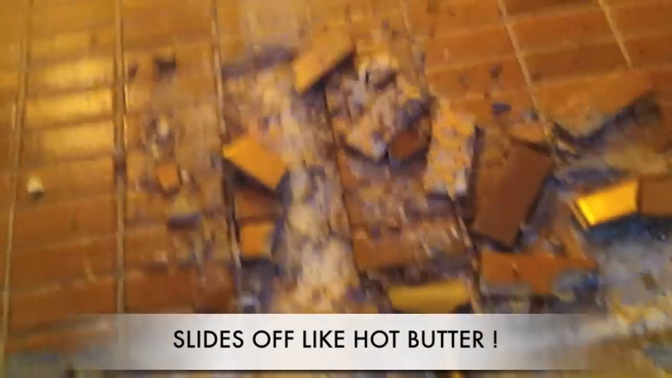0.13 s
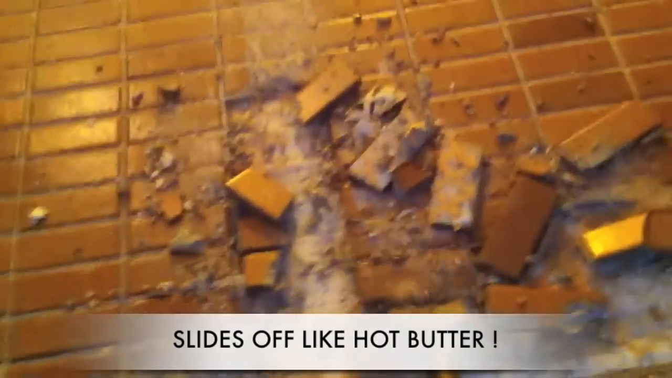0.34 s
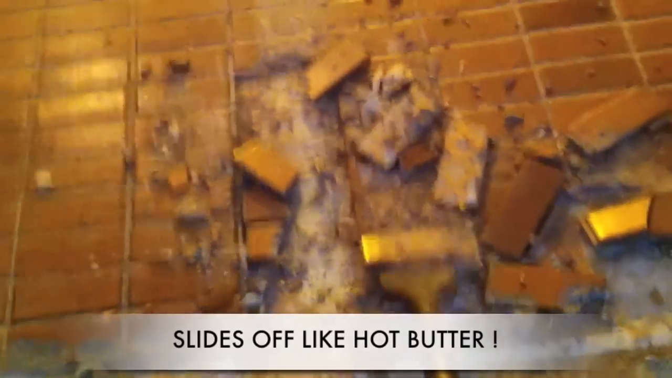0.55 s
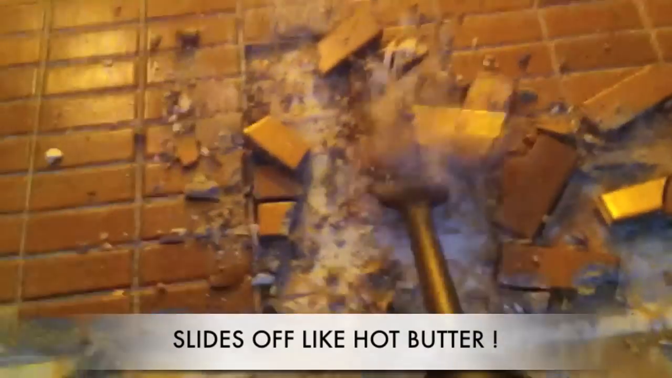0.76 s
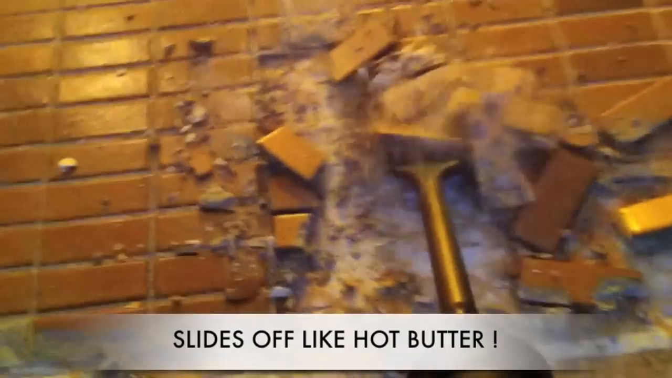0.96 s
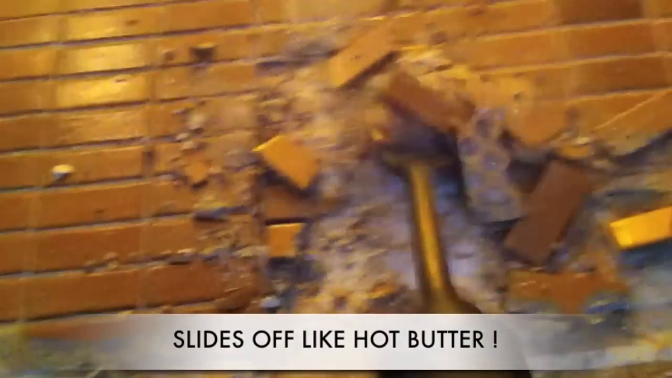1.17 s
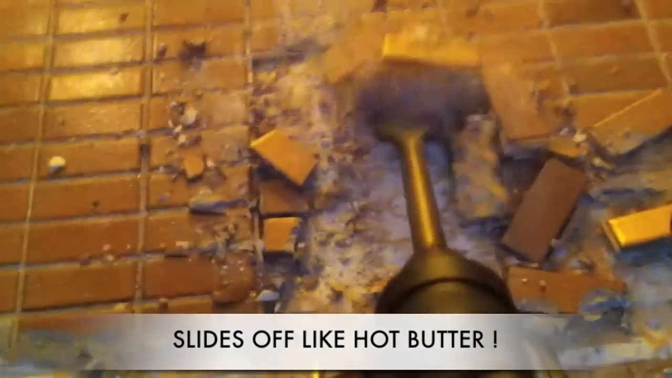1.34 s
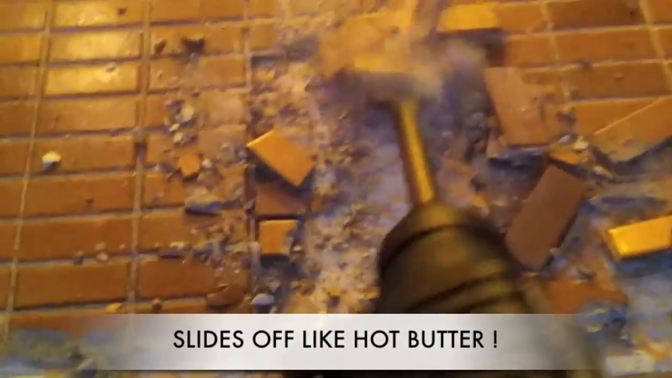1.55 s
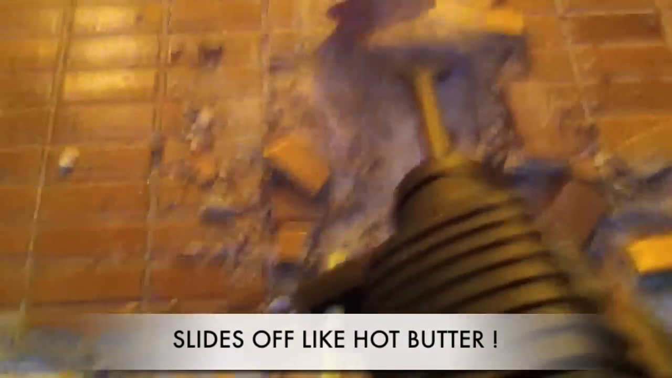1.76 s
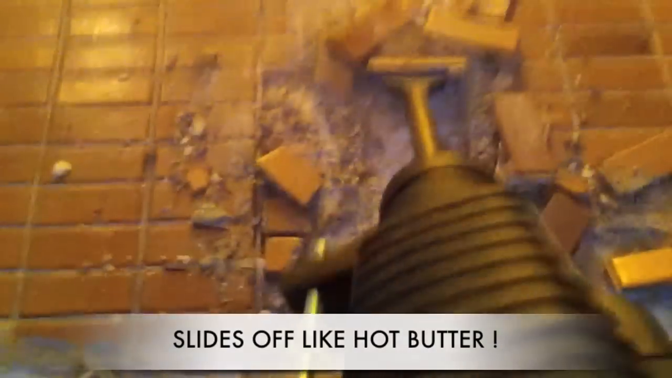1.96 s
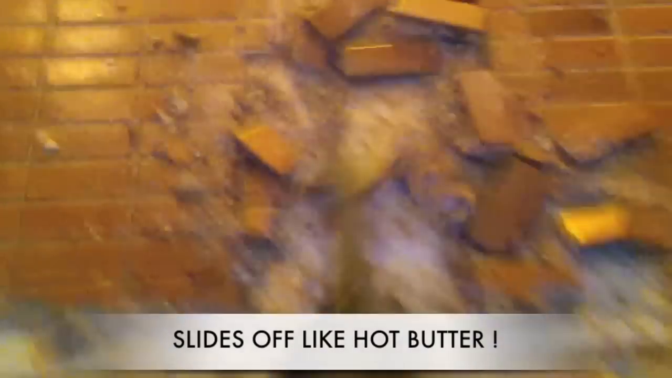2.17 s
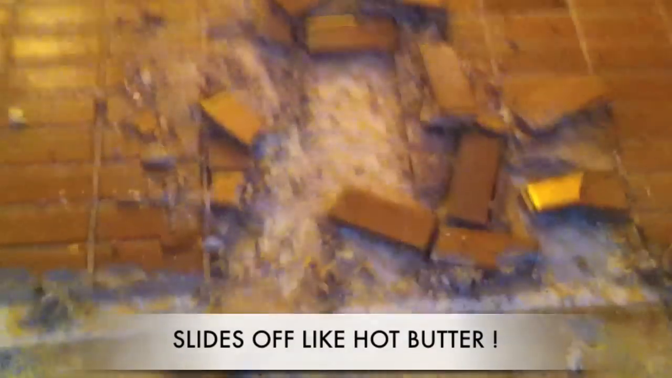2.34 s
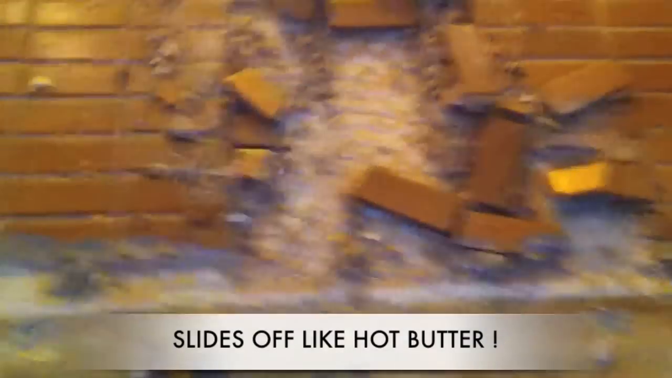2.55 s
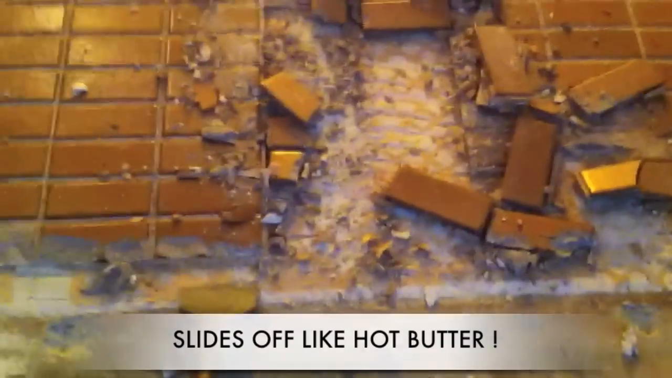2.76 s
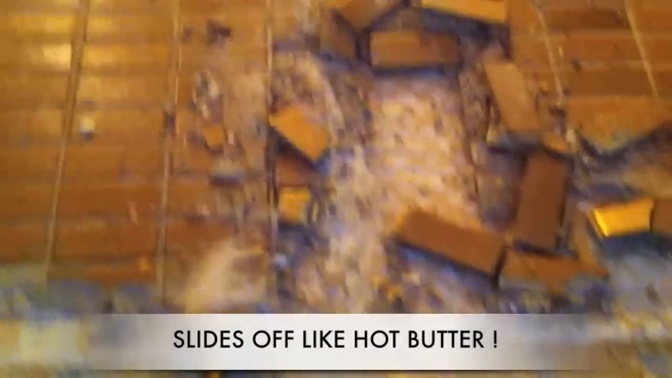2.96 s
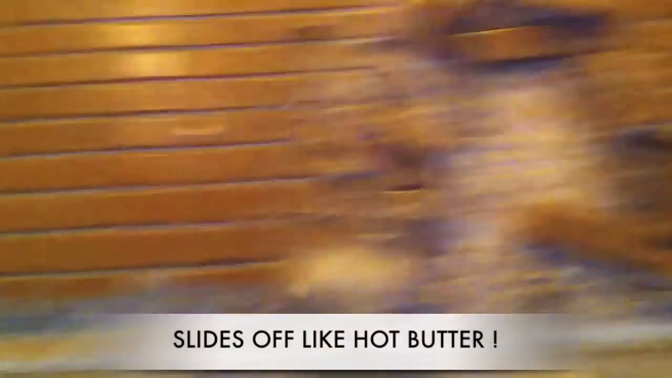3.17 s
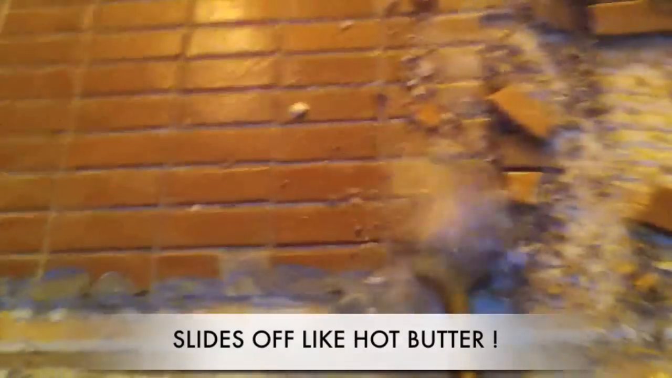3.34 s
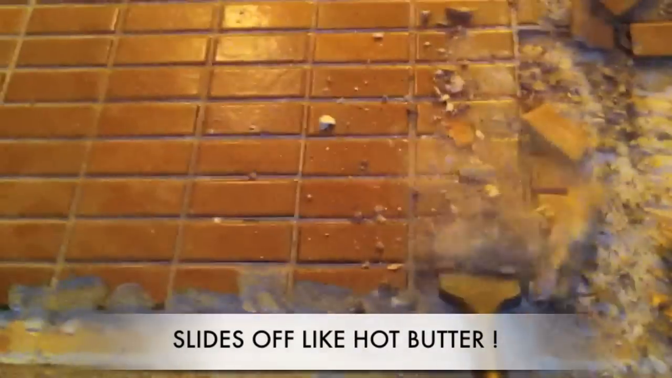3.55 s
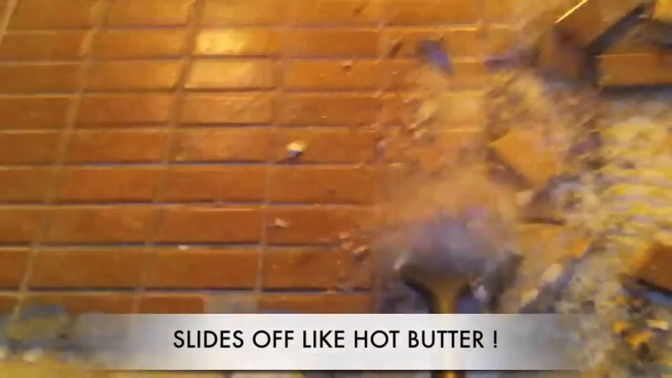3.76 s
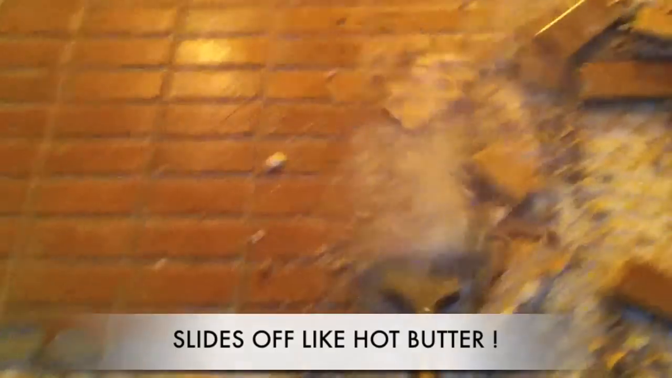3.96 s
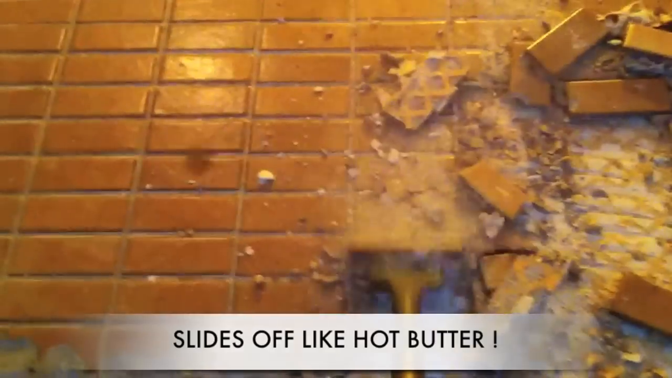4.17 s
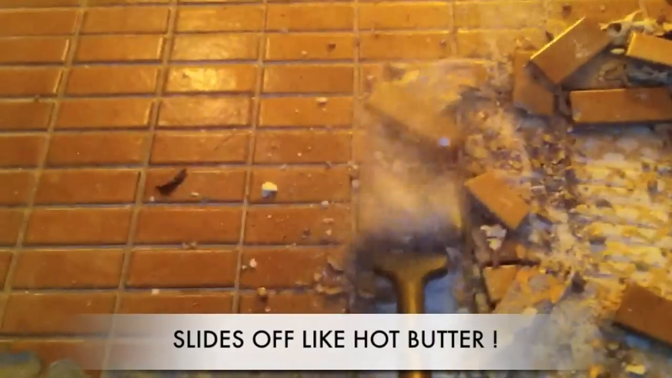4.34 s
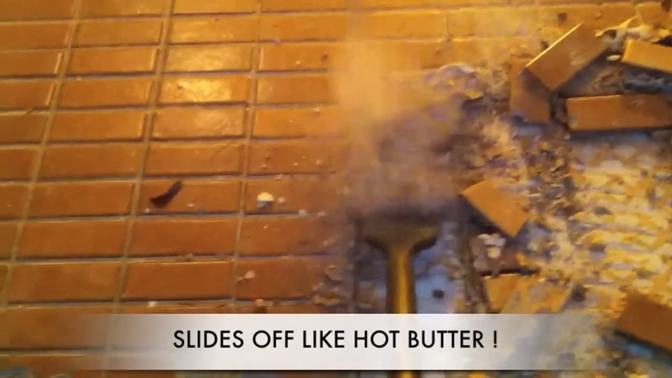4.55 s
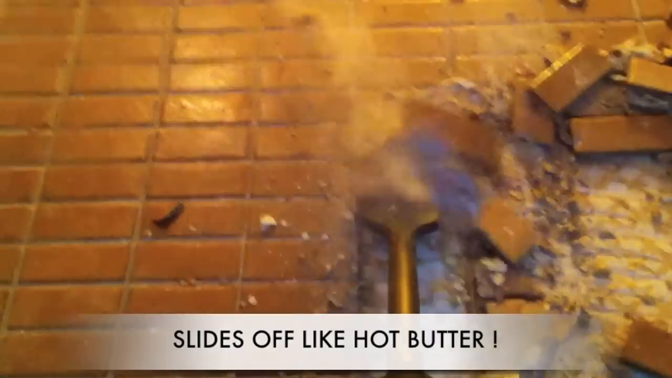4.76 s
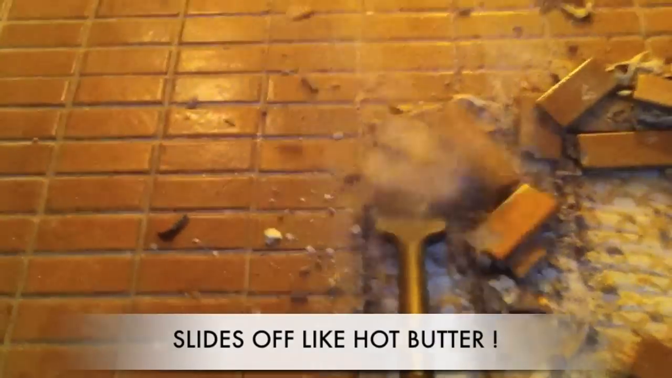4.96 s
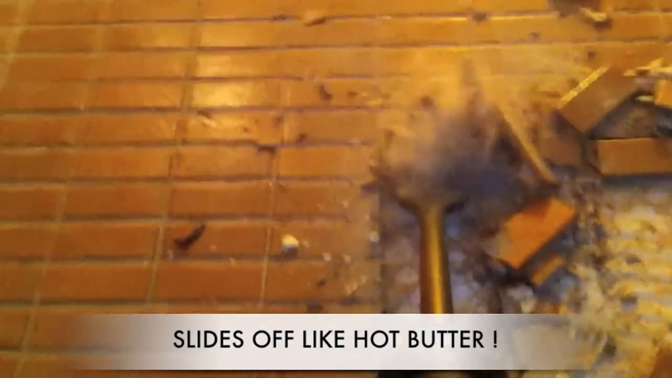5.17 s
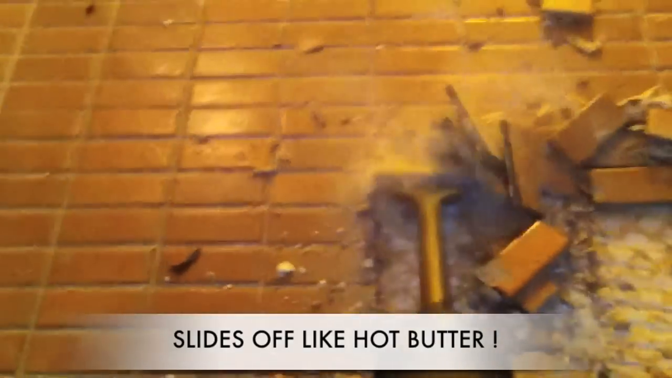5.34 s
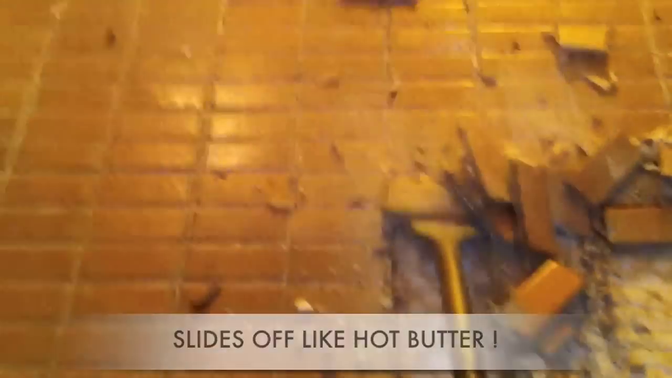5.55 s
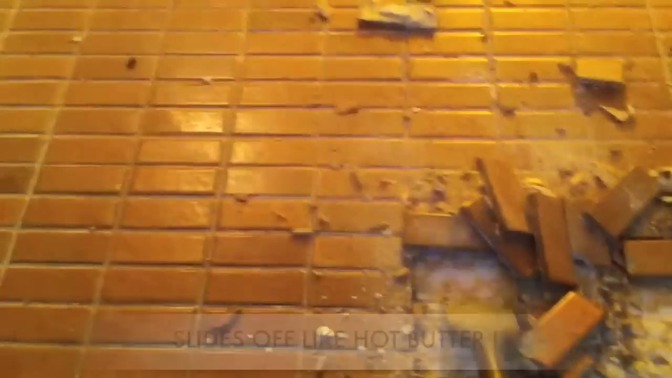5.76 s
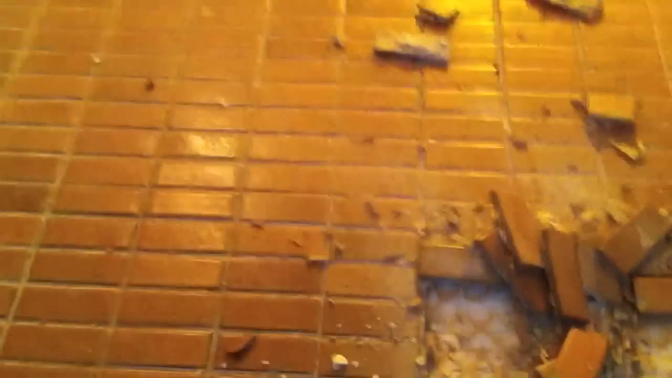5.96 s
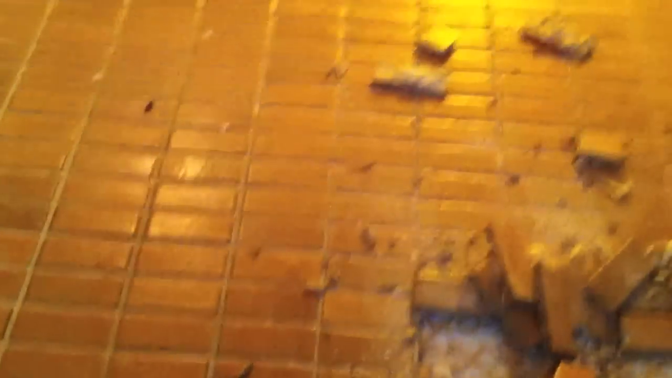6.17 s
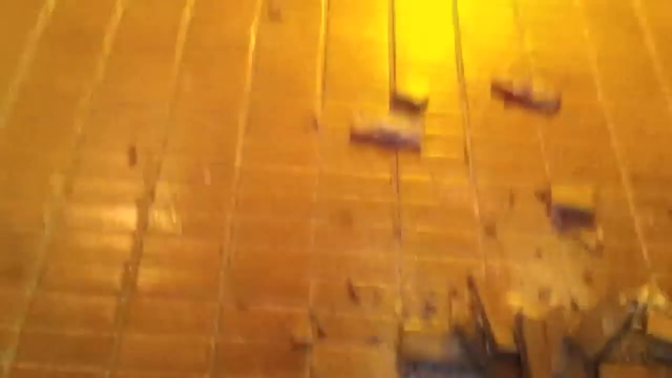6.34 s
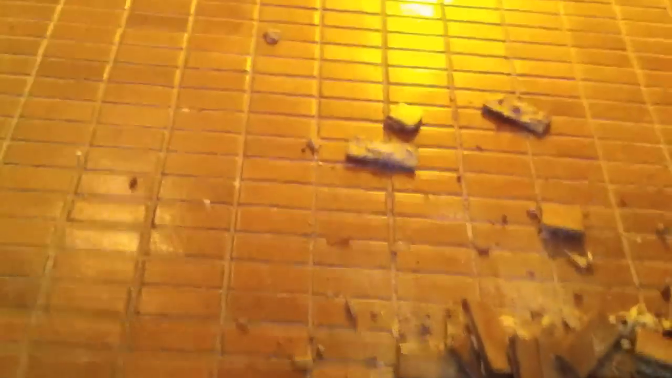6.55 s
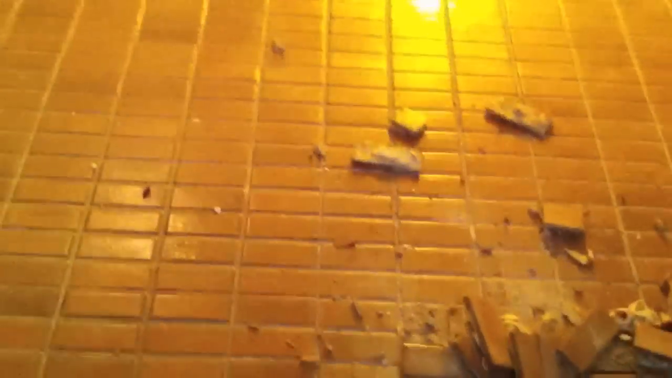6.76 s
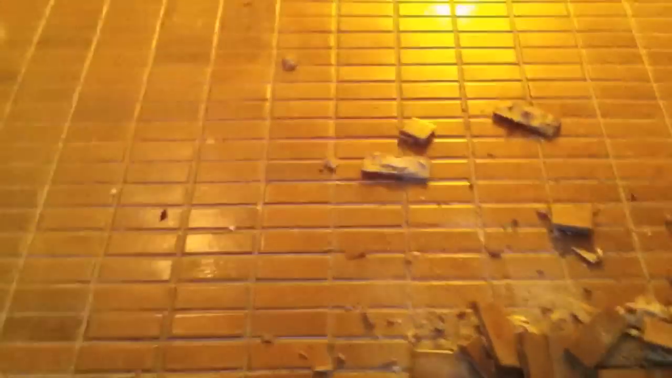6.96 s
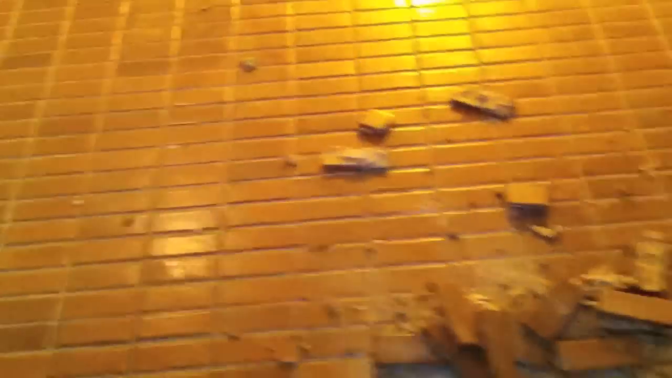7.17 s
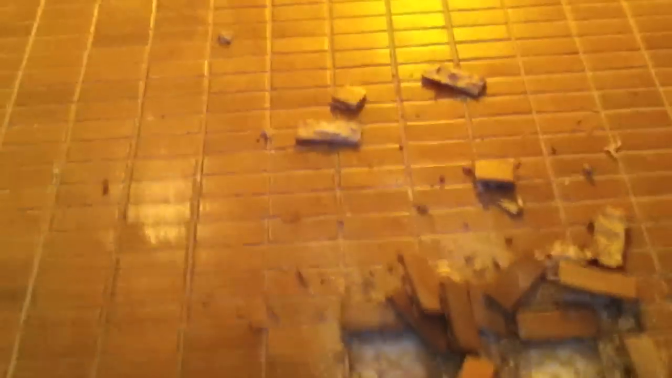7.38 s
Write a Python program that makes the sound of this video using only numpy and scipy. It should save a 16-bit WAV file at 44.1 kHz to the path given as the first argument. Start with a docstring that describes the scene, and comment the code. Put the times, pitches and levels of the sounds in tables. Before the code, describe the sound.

Close up in a bare, hard-walled room, a few broken tiles knock and scrape, then an electric hammer drill bursts into fast, harsh pounding for about two seconds. It coasts down amid clacking fragments, then hammers again for nearly three seconds with clinking chips. The motor winds down with dry clacks; near silence follows, ending in sparse tile knocks, one of them sharp.

```python
"""An electric hammer drill with a wide chisel lifts ceramic tiles off a concrete floor in a bare room, in two bursts.
Each piston stroke gives a blow, a thud in the slab, a ping of the steel and a rebound; loose tiles rattle on the blade.
Impacts are clicks passed through resonances; crumbling, air and rubbing are filtered noise; gears are locked tones.
After each burst the motor coasts down with a few idle blows. Broken tiles knock and scrape before, between and after."""
import sys
import numpy as np
from scipy import signal
from scipy.fft import rfft, irfft
from scipy.io import wavfile

SR = 44100
rng = np.random.default_rng(int(sys.argv[2]) if len(sys.argv) > 2 else 0)


def dump(signal):
    """Clip the signal to [-1, 1] and save it as 16-bit WAV at the path in sys.argv[1]."""
    limited = np.clip(np.atleast_2d(signal).T, -1, 1)
    pcm = np.round(limited * 32767).astype(np.int16)
    wavfile.write(sys.argv[1], SR, pcm)


N = 326781

FULL_SPEED = 66   # strokes per s
ROTOR_TURNS = 7   # turns of the rotor per stroke
# the trigger is held: (pulled [s], let go [s], loaded rate [strokes/s], spin-up time constant [s],
# softness of the start [1 = none], creep [strokes/s per s], time of one blow [s])
PULLS = [(.23, 2.128, 65.4, .114, 1.55, .517, .4376), (2.7607, 5.485, 66.749, .0913, 1, .111, 2.9400)]
# lengthwise modes of the chisel: (frequency [Hz], relative level [dB], t60 [s])
STEEL = [(10560, 3, 0.012), (10720, 5.5, 0.014), (11320, 9, 0.011), (11330, 6.5, 0.023), (11960, 0, .008)]
# a whole tile rides on the blade: (middle [s], length [s], level [dB])
RIDES = [(.88, 0.27, -47), (1.58, 0.31, -28.5), (1.96, 0.45, -24), (4.85, .35, -28.5), (5.47, 0.11, -28)]


def from_db(db):
    """Decibels to gain: 20 dB is a factor of ten in amplitude."""
    return 10 ** (np.asarray(db) / 20)


def rms_one(x):
    """Normalise to unit mean power."""
    return x / np.sqrt(np.mean(x ** 2) + 1e-20)


def at_hz(points, hz):
    """Linear interpolation of a table on a logarithmic frequency axis."""
    f, value = np.transpose(points)
    return np.interp(np.log(np.maximum(hz, 1)), np.log(f), value)


def response(spectrum, resonances=(), size=4096):
    """Minimum-phase impulse response of unit energy: a broad colour with resonant lifts, by the cepstrum."""
    hz = np.arange(size // 2 + 1) * SR / size
    lifts = sum(lift / (1 + (2 * (hz - f) / width) ** 2) for f, width, lift in resonances)
    db = at_hz(spectrum, hz) + lifts
    # folding the cepstrum onto positive time makes the response causal
    cepstrum = irfft(np.log(from_db(db)))[:size // 2]
    cepstrum[1:] *= 2
    h = irfft(np.exp(rfft(cepstrum, size)))
    return h / np.linalg.norm(h)


def through(x, h):
    """Linear system: convolve a sound with an impulse response."""
    return signal.oaconvolve(x, h)[:len(x)]


def filtered(x, order, edges_hz, kind):
    """Butterworth filter, flat in its pass band."""
    return signal.sosfilt(signal.butter(order, edges_hz, kind, fs=SR, output="sos"), x)


def fade(t60, rise_s=0.00053):
    """Exponential decay by 60 dB in t60 after a brief rise; unit energy."""
    t = np.arange(1, int(t60 * SR) + 3) / SR
    env = from_db(-60 * t / t60) * (1 - np.exp(-(t / rise_s) ** 2))
    return env / np.linalg.norm(env)


def clicks(times, sizes):
    """Impulse train: one sample per hit."""
    return np.bincount(np.clip(np.round(times * SR).astype(int), 0, N - 1), sizes, N)


def crunch(hits, t60):
    """Incoherent decay: the powers of the hits add, and fresh noise fills the envelope."""
    power = np.abs(through(hits ** 2, fade(t60) ** 2))
    return np.sqrt(power) * rng.standard_normal(N)


def scatter(t60, rise_s=.0007, size=1024, count=6):
    """Multipath scattering in a solid smears a click in time but leaves its spectrum nearly flat."""
    decay = from_db(-60 * np.arange(size) / (t60 * SR))
    env = decay * np.minimum(np.arange(1, size + 1) / (rise_s * SR), 1)
    h = env * rng.standard_normal(size)
    # flatten the spectrum and restore the decay in turn
    for _ in range(count):
        spectrum = rfft(h)
        h = irfft(spectrum / np.abs(spectrum)) * np.minimum(1, 20 * env)
    return h / np.linalg.norm(h)


def uneven(times, spread_db):
    """Random strengths, normal in decibels, of mean power 1."""
    return rms_one(from_db(spread_db * np.clip(rng.standard_normal(len(times)), -2, 2)))


def ring(times, sizes, modes, spread_db):
    """Modal synthesis: each hit excites every mode by its own random strength; a unit hit has about unit energy."""
    out = 0
    total = np.linalg.norm([from_db(db) for _, db, _ in modes])
    for hz, db, t60 in modes:
        env = fade(t60)
        tone = np.sqrt(2) * env * np.sin(2 * np.pi * hz * np.arange(len(env)) / SR)
        hits = clicks(times, sizes * uneven(times, spread_db))
        out = out + from_db(db) / total * through(hits, tone)
    return out


def wander(per_s):
    """Band-limited fluctuation: random knots joined by lines, rms 1."""
    knots = rng.standard_normal(int(per_s * N / SR) + 2)
    return rms_one(np.interp(np.arange(N) * per_s / SR, np.arange(len(knots)), knots))


def swells(rows):
    """Gaussian gains from (middle [s], length between 1/e points [s], level [dB]); overlaps add in power."""
    t = np.arange(N) / SR
    return np.sqrt(sum(from_db(2 * db) * np.exp(-np.minimum(2 * (2 * (t - s) / length) ** 2, 60))
                       for s, length, db in rows))


def still_air():
    """Stationary background: shaped noise of the still room."""
    # (frequency [Hz], relative level per Hz [dB])
    air_colour = [(18, -66.5), (30, -22), (109, -0.5), (569, -4), (649, -2), (1350, -4), (2290, -17.5),
                  (3400, -8), (16000, -20)]
    return from_db(-63) * through(rng.standard_normal(N), response(air_colour))


def knocks(size=4096):
    """Short hard contacts excite the bending resonances of broken tiles, in ratios to a main ring."""
    # (time [s], peak [dB], main ring [Hz], strength of the ring [1], bass [dB], treble [dB])
    contacts = [(.017, -22.5, 730, .8, -6, 5), (0.085, -17.5, 1390, 0.8, -12, -3),
                (0.1132, -17, 690, 0.84, -2, 15), (0.1656, -24, 706, 0.82, -7, -17),
                (.2206, -31, 835, .5, 6, 13), (.2715, -29, 3960, .6, -15, -4),
                (0.3301, -4.5, 1260, .8, -13, 13), (2.3382, -11, 1280, .7, -16, 5),
                (2.3663, -11.5, 1200, .8, -19, -5), (2.387, -13, 1820, .5, -12, 1),
                (2.5869, -14.5, 1410, 0.44, -16, 4), (2.7324, -12.5, 1440, .8, -7, 4),
                (2.753, -12, 3660, 0.4, -5, 5), (6.183, -30, 1700, .9, -13, 3),
                (6.359, -22, 1230, 0.6, -27, -1.5), (6.753, -13, 780, 1.1, 0, 14),
                (6.7655, -19.5, 486, .9, -5, 8), (6.9067, -27, 2830, .2, -3, 15),
                (7.0158, -25, 4100, 0.28, -5, 33), (7.033, -22, 4330, .7, 0, 6),
                (7.08, -4, 1680, 0.95, -9, 17), (7.0925, -26, 2300, .4, 0, 9),
                (7.1489, -22, 1600, .6, 4, 19)]
    # (frequency [Hz], relative level per Hz [dB])
    contact_colour = [(50, -37.5), (170, 2.5), (324, 5.5), (1240, 2.5), (3780, -3.5), (9870, -21),
                      (16000, -34)]
    # (multiple of the main ring [1], width as a share of the pitch [1], lift at ring strength 1 [dB])
    piece_modes = [(.58, .2, 4), (1, .32, 14), (1.42, 0.15, -4.5), (1.66, 0.1, 7), (2.3, .1, 1),
                   (2.7, .15, -0.5), (3.7, 0.06, 9.5)]
    out = np.zeros(N + size)
    for s, peak_db, ring_hz, ringing, bass_db, treble_db in contacts:
        tilt = [(323, bass_db), (1240, 0), (3780, treble_db)]
        colour = [(hz, db + at_hz(tilt, hz)) for hz, db in contact_colour]
        resonances = [(k * ring_hz, width * k * ring_hz, ringing * lift) for k, width, lift in piece_modes]
        knock = np.convolve(scatter(t60=0.0171), response(colour, resonances))[:size]
        start = max(0, round(s * SR))
        out[start:start + size] += from_db(peak_db) * knock / np.abs(knock).max()
    return out[:N]


def chisel_taps():
    """Free bending vibration: lifted off the floor, the chisel rings on after it touches a tile."""
    # (time [s], level [dB])
    touches = [(.017, -11), (.1656, -26), (6.7533, -10), (6.9057, -26)]
    # bending modes: (frequency [Hz], relative level [dB], t60 [s])
    bending = [(772, -1, 0.18), (1130, -12, 0.2), (2880, -3, .2), (4130, -10.5, .2)]
    s, db = np.transpose(touches)
    return ring(s, from_db(db), bending, spread_db=1.0)


def rubble():
    """Granular friction: grit and chips pushed over the floor give dense, uneven random impulses."""
    # (middle [s], length [s], level [dB])
    shoves = [(.025, 0.088, -39.5), (.145, 0.078, -40.5), (.325, 0.052, -19), (2.3, 0.34, -24),
              (2.868, 0.056, -20.5), (6.15, 0.058, -46), (6.73, 0.13, -54.5), (6.925, 0.031, -43.5),
              (7.06, 0.34, -48.5)]
    # (frequency [Hz], relative level per Hz [dB])
    rubble_colour = [(59, -64), (100, -40.5), (425, -13.5), (633, -10), (764, -7.5), (923, -22.5),
                     (1190, -5.5), (1400, -25), (2860, -4.5), (15000, -21.5)]
    # resonances of a piece: (centre [Hz], width [Hz], lift [dB])
    piece = [(830, 170, 9.5), (1700, 870, 17.5), (2390, 290, -6), (2730, 80, -6.5), (3960, 490, 8),
             (5900, 720, 7)]
    present = rng.random(N) < 4000 / SR   # grains per s
    strength = from_db(0.87 * np.minimum(rng.exponential(1, N), 4))
    grains = present * rng.choice([-1, 1], N) * strength
    return swells(shoves) * rms_one(through(grains, response(rubble_colour, piece)))


def stroke_rate():
    """Rotor dynamics: the motor closes in on its loaded speed; once let go, fan drag and friction slow it."""
    fan_drag = .054   # share of speed lost per stroke
    friction = 25     # strokes per s lost each s
    knee = np.sqrt(friction / fan_drag)   # speed at which both brake alike
    t, speed = np.arange(N) / SR, 1e-3
    for pulled, let_go, loaded, spin_up_s, softness, creep, _ in PULLS:
        held = np.clip(t, pulled, let_go) - pulled
        driven = (loaded + creep * held) * (1 - np.exp(-(held / spin_up_s) ** softness))
        # constant plus quadratic braking makes the speed fall as a tangent
        slowing = knee * fan_drag * np.maximum(t - let_go, 0)
        coasting = knee * np.tan(np.maximum(np.arctan(driven / knee) - slowing, 0))
        speed = np.maximum(speed, coasting)
    return speed


def strokes(speed, beat_s, start, end):
    """Phase is the integral of rate: strokes counted from the blow at beat_s, and blow times from start to end."""
    t, turns = np.arange(N) / SR, np.cumsum(speed) / SR
    turns = turns - np.interp(beat_s, t, turns)
    at = np.interp(np.arange(np.ceil(turns[0]), turns[-1]), turns, t)
    return turns, at[(at > start) & (at < end)]


def locked_tones(orders, turns, wobble):
    """Tooth-mesh tones at multiples of the stroke rate, each a little unsteady in phase; rms 1."""
    return rms_one(sum(from_db(db) * np.sin(2 * np.pi * order * turns + wobble * wander(per_s=170))
                       for order, db in orders))


def gears(turns, wobble):
    """Meshing gear teeth radiate harmonics of the stroke rate."""
    # (multiple of the stroke rate [1], relative level [dB])
    gear_whine = [(8, -12.5), (12, -17), (19, 1.5), (27, 0.5), (31, 1.5), (32, -12), (34, -2), (35, 2.5),
                  (44, -5), (64, -17.5)]
    return locked_tones(gear_whine, turns, wobble)


def motor(speed):
    """Flow noise and gear whine grow as powers of speed; brush and gear friction is noise modulated by rotation."""
    # cooling air: (frequency [Hz], relative level per Hz [dB])
    fan_colour = [(59, -81.5), (100, -37), (215, -24), (277, -24), (705, -2), (950, -3), (1130, -1.5),
                  (2690, -1.5), (3940, 2.5), (10000, -10.5), (11600, -13), (16000, -40)]
    # rubbing brushes and gears: (frequency [Hz], relative level per Hz [dB])
    brush_colour = [(59, -55), (100, -45), (365, -23), (406, -19), (452, -18), (492, -15.5), (570, -14.5),
                    (721, -13), (1360, -20), (1650, -5), (3190, -6), (3470, -2), (4870, -6), (6150, -9.5),
                    (16000, -35.5)]
    # (rate [strokes/s], level before modulation [dB])
    brush_level = [(0, -66), (2, -54), (6, -48.5), (11, -35), (20, -38.5), (66, -33)]
    # (centre [Hz], width [Hz], lift [dB])
    housing = [(730, 110, 7.5), (1710, 214, 7), (3560, 190, 6.5), (6100, 600, 6.5)]
    turns, share = np.cumsum(speed) / SR, np.maximum(speed / FULL_SPEED, 1e-6)
    rush = rng.standard_normal(N) * from_db(1.68 * wander(per_s=140))
    fan = from_db(-21) * share ** 1.235 * through(rush, response(fan_colour))
    rotor_beat = (1 + 0.41 * np.sin(2 * np.pi * turns * ROTOR_TURNS)) * from_db(2.4 * wander(per_s=190))
    # the crank clatters once a stroke
    crank = 0.92 + 0.2 * np.exp(-7 * (turns % 1))
    rub = from_db(np.interp(speed, *np.transpose(brush_level))) * rotor_beat * crank * rng.standard_normal(N)
    whine = from_db(-36.5) * share ** 1.6 * gears(turns, wobble=1.15)
    return fan + through(rub, response(brush_colour, housing)) + whine


def glide(speed, level_db=-30):
    """Order tracking: gear tones stand out and slide while the motor speeds up or coasts."""
    # (multiple of the stroke rate [1], relative level [dB])
    coast_tones = [(19, -9), (27, -6), (35, 3), (54, -12.5), (70, -12.5)]
    turns, share = np.cumsum(speed) / SR, np.minimum(speed / FULL_SPEED, 1)
    # the small housing gives off no bass
    tones = filtered(locked_tones(coast_tones, turns, wobble=.45), 5, 620, "high")
    return from_db(level_db) * share ** 1.6 * (1 - share ** 12) * tones


def chatter(speed):
    """Backlash: slack gear teeth knock about once a rotor turn and excite the modes of the gearbox."""
    # (frequency [Hz], relative level [dB], t60 [s])
    gearbox = [(733, -3.5, .03), (1580, 0.5, 0.019), (1764, -1, .016), (2950, -3, .01), (3490, -1, 0.017),
               (4060, -4, 0.011), (6040, -5.5, .01)]
    t, turns = np.arange(N) / SR, np.cumsum(speed) / SR * ROTOR_TURNS
    whole = np.arange(1, int(turns[-1]))
    at = np.interp(whole + rng.uniform(-.2, .2, len(whole)), turns, t)
    # knocks weaken below 14 strokes per s
    strength = np.minimum(np.interp(at, t, speed) / 14, 1) ** 1.3
    return ring(at, from_db(-19) * strength * uneven(at, spread_db=3), gearbox, spread_db=4)


def shifting(x, count=20):
    """Time-varying resonances: those of the tiles come and go as the tiles crack and move under the blade."""
    out = x
    for hz in np.geomspace(1120, 8700, count):
        # slow change as the blade advances, fast change as pieces jump
        gain = rms_one(from_db(1.2 * wander(per_s=4) + 2.7 * wander(per_s=40)))
        out = out + (gain - 1) * signal.lfilter(*signal.iirpeak(hz, 14, fs=SR), x)
    return out


def per_stroke(gain, at, period):
    """Energy per blow is power times period: turn a gain in time into a size for each blow."""
    return np.interp(at, np.arange(N) / SR, gain) * np.sqrt(period * SR)


def impacts(at, back, period, press, colour, strike_db, crush_db):
    """Impact excitation: a repeatable blow of the steel, crumbling mortar, and the rebound in the holder."""
    start, _, blow_db, rebound_db, _, _ = press
    since = np.maximum(np.arange(N) / SR - start, 0)
    # the blows start 6.5 dB weaker and grow as the operator leans in
    gain = from_db(blow_db - 6.5 * np.exp(-since / 0.23) + wander(per_s=17))
    blow = per_stroke(gain, at, period)
    hits = clicks(at, blow * uneven(at, spread_db=2.0))
    bounces = clicks(back, blow * uneven(at, spread_db=1.0))
    # the steel answers alike each time; a moment later the mortar crumbles, always differently
    crumbs = clicks(at + rng.uniform(0.00028, 0.0027, len(at)), blow * uneven(at, spread_db=0.5))
    steel_blow = from_db(strike_db) * through(hits, scatter(t60=0.018))
    strike = steel_blow + from_db(crush_db) * crunch(crumbs, t60=0.02)
    # the chisel bounces back into its holder: a lighter clack with little bass
    clack = through(bounces, scatter(t60=0.011)) + crunch(bounces, t60=0.022)
    clack = filtered(clack, 1, [1700, 8000], "band")
    return shifting(through(strike + from_db(rebound_db) * clack, colour))


def slab_thuds(at, period, press, thud_db):
    """Mechanical coupling: the slab's low resonances sound as hard as the blade happens to grip."""
    # the blade grips the concrete: (middle [s], level before the burst's thud gain [dB])
    grip_times = [(.44, -34), (.5, -29.5), (.55, -34), (0.776, -23), (.865, -27.5), (.91, -25), (.98, -28),
                  (1.062, -24), (1.12, -26), (1.17, -31), (1.24, -26.5), (1.32, -22.5), (1.365, -26),
                  (1.42, -26), (1.495, -29), (1.55, -30), (1.6, -29.5), (1.675, -26), (1.715, -26.5),
                  (1.8, -27), (1.92, -26), (1.97, -27), (2.03, -27), (2.08, -28), (2.13, -29), (2.965, -27),
                  (3.09, -33.5), (3.17, -31.5), (3.255, -19.5), (3.285, -21.5), (3.34, -33), (3.395, -32),
                  (3.51, -24), (3.6, -23), (3.645, -25.5), (3.735, -23), (3.78, -31), (3.88, -26),
                  (3.96, -29), (4.035, -22), (4.1, -26), (4.15, -24.5), (4.22, -28), (4.275, -25),
                  (4.35, -25.5), (4.395, -24), (4.45, -28), (4.5, -25), (4.565, -25), (4.62, -28),
                  (4.69, -21.5), (4.78, -29), (4.84, -27.5), (4.92, -26), (4.98, -23), (5.025, -22.5),
                  (5.167, -22.5), (5.23, -19), (5.29, -22.5), (5.335, -25.5), (5.43, -23), (5.485, -36)]
    # (frequency [Hz], relative level per Hz [dB])
    thud_colour = [(30, -20.5), (65, -17.5), (95, -3.5), (150, 0.5), (200, 5.5), (300, 2), (450, 1),
                   (800, -24), (2000, -73)]
    # deepest part: (frequency [Hz], relative level per Hz [dB])
    shudder_colour = [(20, -5), (45, 0), (80, 0), (160, -18), (500, -67.5)]
    start, bite_s = press[0], press[-1]
    since = np.maximum(np.arange(N) / SR - start, 0)
    ordinary = from_db(-35 + 2.8 * wander(per_s=33)) * (1 - np.exp(-since / bite_s))
    hard = swells([(s, 0.029, db) for s, db in grip_times])
    thud = per_stroke(np.hypot(ordinary, from_db(thud_db) * hard), at, period)
    grips = clicks(at + rng.normal(0, 0.00066, len(at)), thud * uneven(at, spread_db=1.5))
    shudders = clicks(at, thud * uneven(at, spread_db=5.5))
    out = through(grips + .5 * crunch(grips, t60=0.01), response(thud_colour))
    return out + from_db(-22) * through(shudders, response(shudder_colour))


def steel_pings(at, period, ping_db):
    """Damping by contact: longitudinal modes ping louder as the blade comes free, fainter under a riding tile."""
    # the blade comes free of the floor: (middle [s], length [s], level before the burst's ping gain [dB])
    slips = [(1.53, 0.16, -21.5), (1.768, .025, -14), (2.132, 0.021, -11), (2.87, 0.054, -22.5),
             (3.06, .04, -17), (3.5, 0.16, -20), (3.89, 0.06, -16), (4.82, 0.036, -19), (5.385, 0.046, -13),
             (5.5, .055, -11)]
    riding = swells(RIDES)
    # the fullest ride takes 22 dB off the ordinary ping
    damped = from_db(-27 - 22 * riding / riding.max() + 2 * wander(per_s=18))
    ping = per_stroke(from_db(ping_db) * np.hypot(damped, swells(slips)), at, period)
    return ring(at + rng.uniform(0, .001, len(at)), ping, STEEL, spread_db=2.5)


def tile_rattle(at, back, period):
    """Intermittent contact: loose tiles hop on both the blow and the rebound and ring in their own modes."""
    # (frequency [Hz], relative level [dB], t60 [s])
    tile_modes = [(3390, -1.5, 0.048), (3457, 4.5, 0.015), (3830, 5.5, 0.025), (3970, -1.5, 0.041),
                  (4780, -15, .03)]
    # small pieces always rattle a little
    gain = np.hypot(from_db(-39.5 + 3.6 * wander(per_s=11.0)), swells(RIDES))
    rattle = per_stroke(gain, at, period)
    hops = np.concatenate([at, back]) + rng.uniform(0, 0.001973, 2 * len(at))
    return ring(hops, np.tile(rattle, 2), tile_modes, spread_db=2.5)


def gear_strain(turns, press):
    """Load modulation: gears sing loudest as the piston compresses its air cushion, just before each blow."""
    start, end, strain_db = press[0], press[1], press[4]
    t = np.arange(N) / SR
    # the gears work 2.5 dB per s less hard as the tiles come loose
    level_db = strain_db - 2.5 * np.maximum(t - start, 0) + 0.74 * wander(per_s=12)
    strain = from_db(level_db) * ((t > start) & (t < end))
    return strain * (1 + 0.75 * np.cos(2 * np.pi * (turns + 0.032))) * gears(turns, wobble=0.55)


def burst(speed, press, beat_s, colour, strike_db, crush_db, thud_db, ping_db):
    """Periodic excitation: one blow a piston stroke, with its answers, while the chisel is pressed down."""
    turns, at = strokes(speed, beat_s, press[0], press[1])
    period = 1 / np.interp(at, np.arange(N) / SR, speed)
    # the free-flying striker lands a little early or late, which blurs the upper harmonics
    at = at + rng.normal(0, .00008, len(at))
    back = at + period * rng.normal(.57, 0.014, len(at))
    out = impacts(at, back, period, press, colour, strike_db, crush_db)
    out += slab_thuds(at, period, press, thud_db)
    out += steel_pings(at, period, ping_db)
    out += tile_rattle(at, back, period)
    return out + gear_strain(turns, press)


def chips(press, per_s, level_db):
    """Brittle fracture: chips break off at random, each a short clink; smaller ones are higher and fainter."""
    # (multiple of the chip's pitch [1], relative level [dB])
    chip_modes = [(1, -1), (1.23, 1), (1.41, -3)]
    low_hz, high_hz = 2190, 11050   # large to tiny chips
    start, end, out = press[0], press[1], np.zeros(N)
    t = np.arange(SR // 20) / SR
    env = from_db(-60 * t / 0.012) * np.minimum(t / 0.00025, 1)   # t60 of 0.012 s
    for when, smallness, chance in rng.random((round(per_s * (end - start)), 3)):
        hz = low_hz * (high_hz / low_hz) ** smallness
        clink = env * sum(from_db(db) * np.sin(2 * np.pi * k * hz * t) for k, db in chip_modes)
        i = round((start + when * (end - start)) * SR)
        out[i:i + len(t)] += from_db(level_db - 3.5 * smallness - 23 * chance) * clink
    return out


def skids(blows):
    """Selective resonance: the blows briefly drive one resonance of the tile under the blade and it sings."""
    # (middle [s], length between 1/e points [s], pitch [Hz], width [Hz], level [dB])
    songs = [(0.343, 0.049, 1230, 160, -23.5), (0.53, 0.8, 1770, 200, -30), (0.56, 0.54, 2240, 180, -28.5),
             (.7, .5, 6270, 130, -34.5), (0.94, 0.18, 3450, 109, -29.5), (1, 0.27, 6540, 150, -33),
             (1.46, 0.26, 2370, 259, -27), (1.8, 0.59, 3430, 130, -27.5), (2.878, .042, 2500, 301, -21),
             (2.87, 0.046, 1300, 151, -29.5), (3, 0.61, 6020, 300, -30.5), (3.036, 0.23, 1280, 110, -30.5),
             (3.164, 0.38, 2390, 340, -25.5), (3.647, 0.52, 1775, 180, -28.5),
             (3.882, 0.77, 2200, 420, -28.5), (4.25, 0.45, 3780, 140, -29.5), (4.25, 0.36, 1256, 90, -33.5),
             (4.978, 0.81, 3010, 261, -28), (5.15, 0.19, 1265, 80, -36), (5.303, 0.4, 7120, 422, -30),
             (5.35, 0.33, 5700, 201, -31.5)]
    t, out = np.arange(N) / SR, 0
    drive = crunch(clicks(blows, uneven(blows, spread_db=2.5)), t60=0.055)
    for s, length, hz, width_hz, db in songs:
        tone = filtered(drive, 2, [hz - width_hz / 2, hz + width_hz / 2], "band")
        swell = np.exp(-np.minimum((2 * (t - s) / length) ** 2, 50))
        out = out + from_db(db) * rms_one(tone) * swell
    return out


def shards(t60=0.033):
    """Single-mode decay: small splinters chink on the blade, each at its own pitch."""
    # (time [s], peak [dB], pitch [Hz])
    splinters = [(0.4718, -14, 6072), (1.371, -13.5, 7800), (1.724, -8, 7830), (2.318, -22, 9300),
                 (2.408, -23, 7550), (3.5941, -13.5, 8314), (4.763, -15, 8060), (5.0596, -14, 6170),
                 (5.108, -11.5, 7400), (5.288, -15, 7300), (5.39, -16, 6203)]
    height = np.sqrt(2) * fade(t60).max()
    return sum(ring(np.array([s]), from_db([db]) / height, [(hz, 0, t60)], spread_db=0)
               for s, db, hz in splinters)


def idle_blows():
    """Unloaded impact: the striker runs on with dry, bright clacks and the chisel rings only faintly."""
    # (time [s], clack level [dB])
    run_on = [(2.19, 7), (2.207, 3.5), (2.244, 5), (5.5665, -18), (5.587, 7), (5.6101, 2), (5.6314, 7.5),
              (5.655, 4), (5.6823, 4), (5.7102, 6), (5.7424, 4.5), (5.776, 1)]
    at, db = np.transpose(run_on)
    colour = response([(300, -15), (1000, 4.0), (4500, 6.5), (9000, -2), (16000, -18)])
    clack = through(crunch(clicks(at, from_db(db)), t60=0.012), colour)
    return clack + ring(at, from_db(db - 18), STEEL, spread_db=3)


def hum():
    """Slow exponential decay: a low, hollow noise tail under the hardest knock."""
    # (frequency [Hz], relative level per Hz [dB])
    hum_colour = [(50, -38), (120, -5), (230, 2), (290, -3), (400, -21), (900, -43)]
    knock = clicks(np.array([7.081]), from_db([-8.5]))
    return through(crunch(knock, t60=0.62), response(hum_colour))


def room(x, count=9):
    """Reverberation off hard walls: a dense tail builds up in milliseconds; each band decays at its own rate."""
    # (frequency [Hz], t60 [s])
    room_t60 = [(100, 0.59), (400, 0.74), (1800, 0.52), (4000, 0.22), (8000, 0.36), (12000, 0.32)]
    t, edges, tail = np.arange(SR) / SR, np.geomspace(60, 17000, count + 1), 0
    for low, high in zip(edges, edges[1:]):
        band = filtered(rng.standard_normal(SR), 2, [low, high], "band")
        tail = tail + band * from_db(-60 * t / at_hz(room_t60, np.sqrt(low * high)))
    # the early part is denser in energy
    tail = tail * np.minimum(t / 0.0085, 1) * (1 + 0.62 * np.exp(-t / 0.031))
    return through(x, tail / np.linalg.norm(tail))


def scene():
    """Superposition: the sounds of tool, tiles and room add up."""
    # the chisel is pressed to the floor: (from [s], to [s], blow [dB], rebound against blow [dB],
    # gear strain at the start [dB], time constant until it bites the slab [s])
    presses = [(0.309, 2.155, -16.5, -8, -33, 0.5), (2.85, 5.535, -17, -10, -28.5, 0.18)]
    # colour of the blows in each burst: (frequency [Hz], relative level per Hz [dB])
    blow_a = [(180, -34), (300, -27.5), (555, -2.5), (614, -1.5), (689, -2.5), (1460, -2.5), (1750, 1.5),
              (2000, -3.5), (3830, 3), (9550, -6), (11100, -1.5), (16000, -20.5)]
    blow_b = [(180, -39.5), (300, -22.5), (494, 0.5), (528, 1), (930, -3), (1230, 0), (1580, -3.5),
              (1750, -5), (3760, 0), (9710, -9), (11300, -1), (16000, -22)]
    # resonances of tool and floor in each burst: (centre [Hz], width [Hz], lift [dB])
    body_a = [(622, 54, 8.5), (1220, 160, 3.5), (1690, 130, -3.5), (2150, 99, -8), (4290, 300, -2.5),
              (6350, 110, 8), (10900, 420, 3)]
    body_b = [(532, 45, 4.5), (1860, 80, 1.3), (2030, 140, 4.8), (2540, 160, 3.5), (2850, 61, 1.1),
              (5330, 950, 5.3), (6300, 280, 2.7)]
    speed = stroke_rate()
    tool = motor(speed) + glide(speed) + chatter(speed) + idle_blows() + chisel_taps()
    first = burst(speed, presses[0], PULLS[0][-1], response(blow_a, body_a),
                  strike_db=-3.5, crush_db=-7.5, thud_db=-1.0, ping_db=-2.5)
    second = burst(speed, presses[1], PULLS[1][-1], response(blow_b, body_b),
                   strike_db=-3.0, crush_db=-6.5, thud_db=-3.0, ping_db=-4.5)
    blows = np.concatenate([strokes(speed, pull[-1], press[0], press[1])[1]
                            for pull, press in zip(PULLS, presses)])
    chipping = chips(presses[0], per_s=120, level_db=-14) + chips(presses[1], per_s=130, level_db=-12.5)
    debris = chipping + shards() + skids(blows)
    dry = first + second + debris + tool + knocks() + hum() + rubble()
    # the thud stays close to the slab and hardly reaches the walls
    to_walls = filtered(dry, 2, 260, "high")
    return (dry + from_db(-9.5) * room(to_walls) + still_air())[None]


def record(dry):
    """Soft saturation rounds the highest peaks; an elliptic low-pass cuts the top at 16.2 kHz."""
    rounded = dry / (1 + (dry / .76) ** 6) ** (1 / 6)
    return signal.sosfilt(signal.ellip(10, .2, 80, 16200, fs=SR, output="sos"), rounded)


dry = scene()
out = record(dry)
dump(out)
```